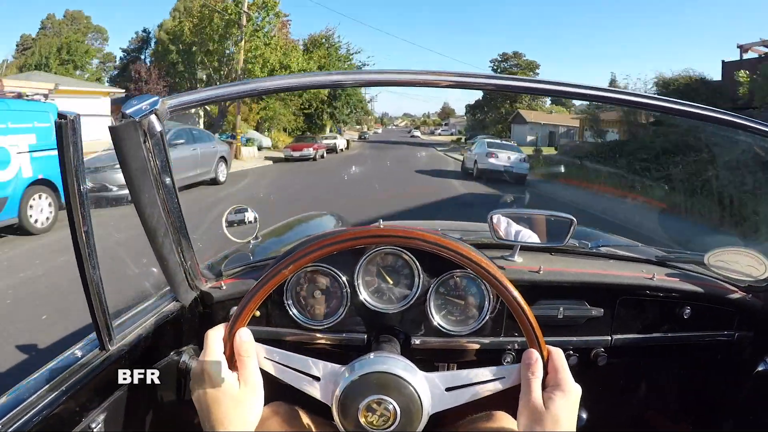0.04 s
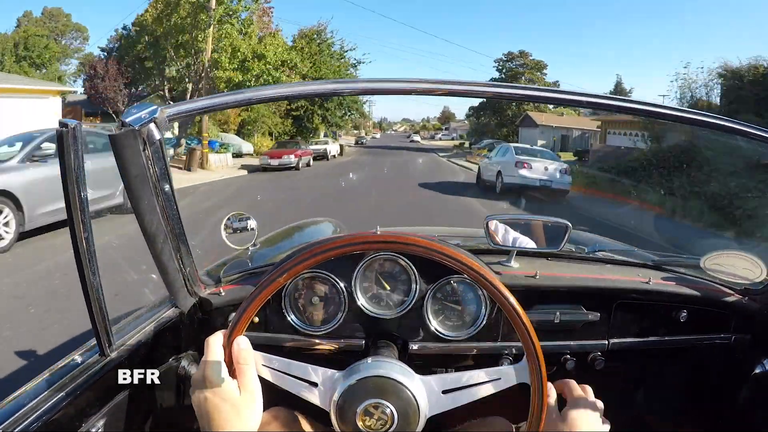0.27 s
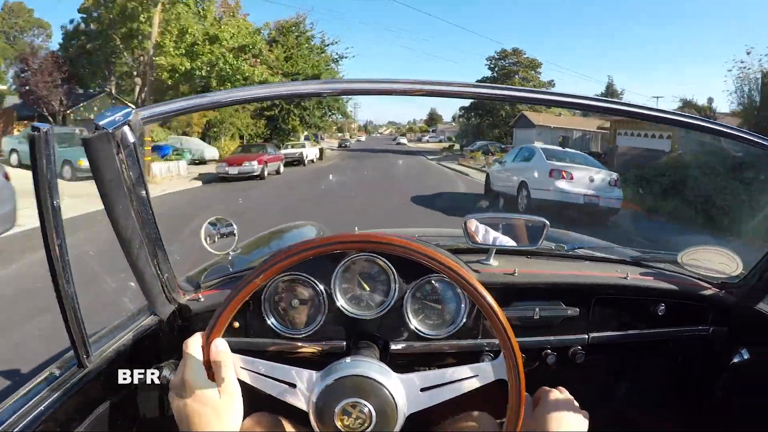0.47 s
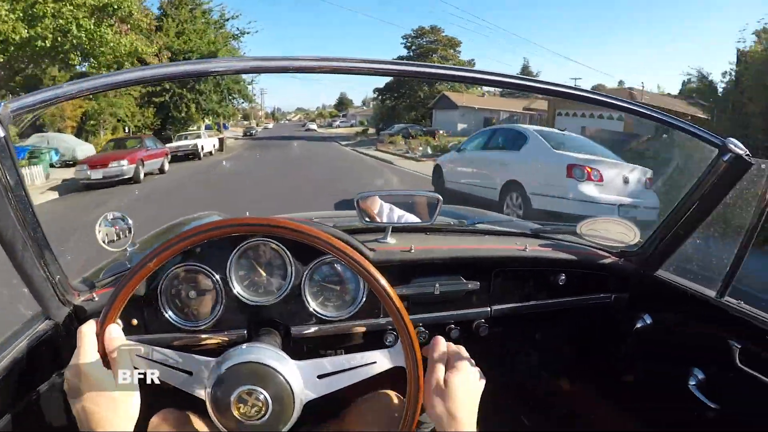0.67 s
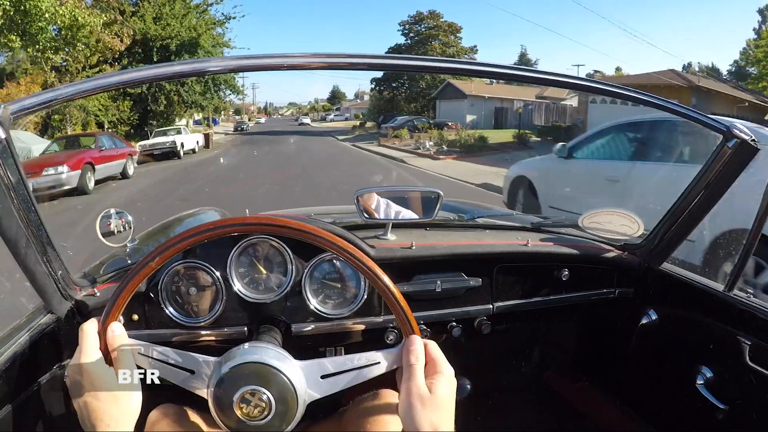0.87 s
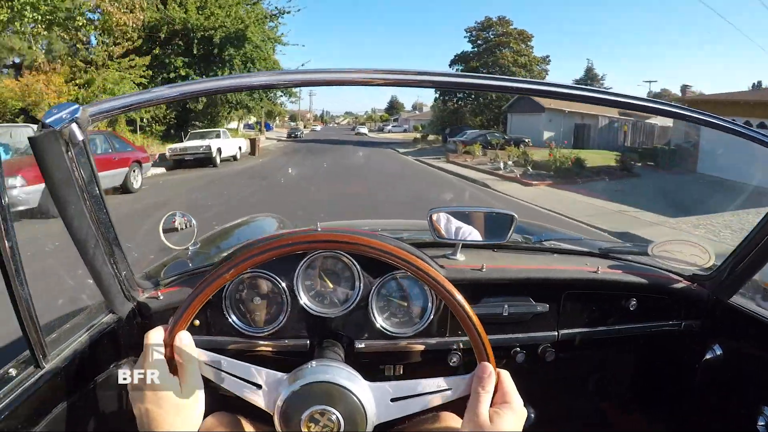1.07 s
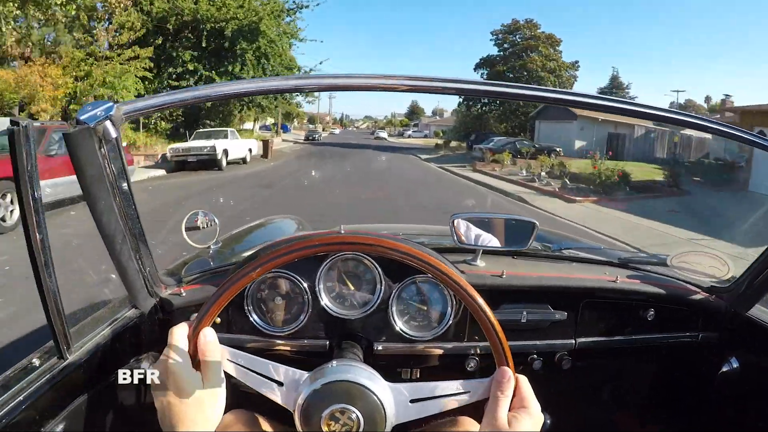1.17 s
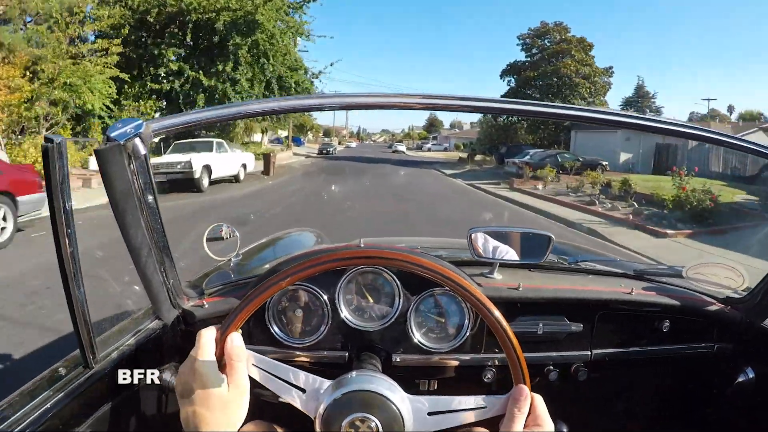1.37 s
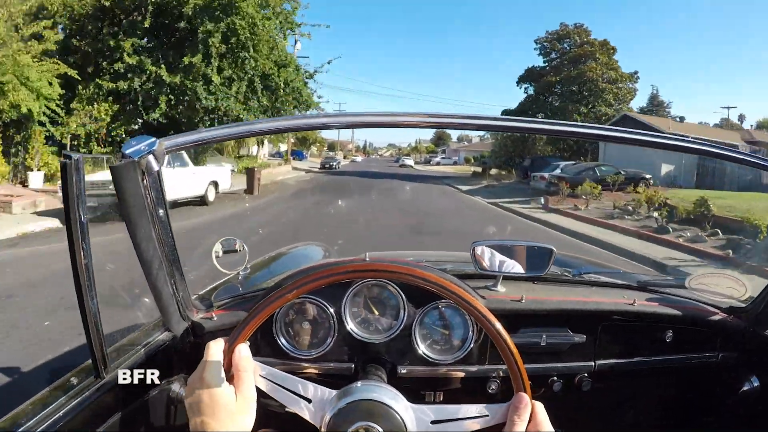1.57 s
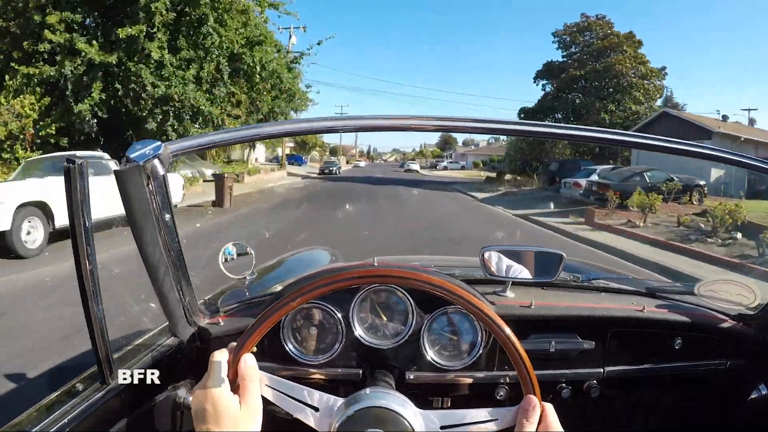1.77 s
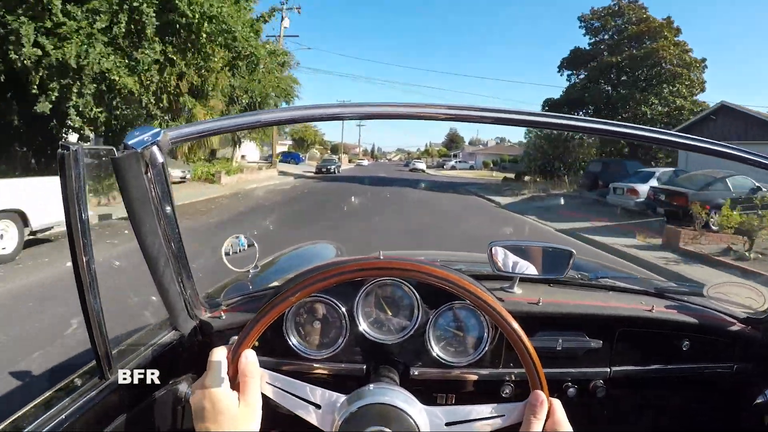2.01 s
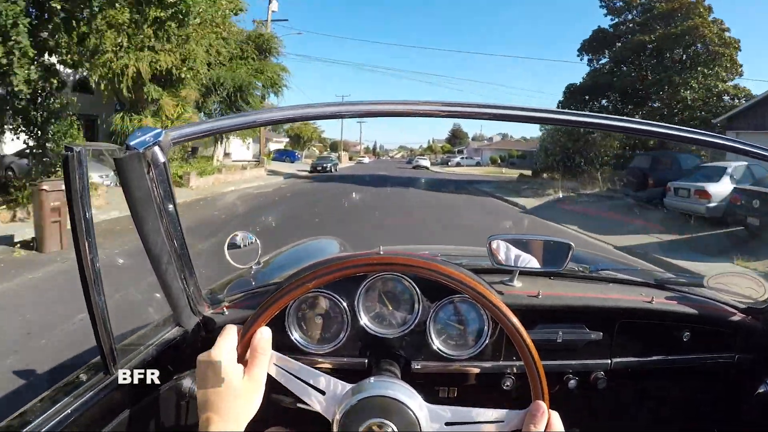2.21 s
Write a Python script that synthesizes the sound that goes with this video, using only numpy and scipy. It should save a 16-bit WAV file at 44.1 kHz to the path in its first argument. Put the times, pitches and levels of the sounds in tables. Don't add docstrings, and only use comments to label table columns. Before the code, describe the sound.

Wind booms and throbs around the driver in an open-top car at town speed, over steady road rumble; dull gusts thump the close stereo microphone, while faint tyre and engine hiss swells past parked cars.

```python
import sys
import numpy as np
from scipy import signal
from scipy.fft import rfft, irfft
from scipy.io import wavfile
from scipy.ndimage import uniform_filter1d, minimum_filter1d

SR = 44100
rng = np.random.default_rng(int(sys.argv[2]) if len(sys.argv) > 2 else 0)


def waveform_to_disk(signal):
    frames = np.transpose(np.atleast_2d(signal))
    scaled = np.clip(frames, -1, 1) * 32767
    samples = np.round(scaled).astype(np.int16)
    wavfile.write(sys.argv[1], SR, samples)


def undo_db(level):
    steps = np.asarray(level, float) / 20
    return 10 ** steps


N = 99180
SIDE_SIGN = np.array([[1], [-1]])

# t/s, f/Hz, level/dB
COCKPIT_BOOM = [(0.0, 81.16, -10), (0.07, 77.84, -15), (0.27, 85.27, -14), (0.31, 81.35, -19),
                (0.61, 84.38, -7), (0.72, 74.55, -9), (0.81, 59.23, -15.5), (0.88, 72.62, -23),
                (0.96, 72.83, -18), (1.22, 69.3, -16), (1.33, 74.9, -7.5), (1.49, 73.9, -13),
                (1.56, 84.3, -11.5), (1.66, 79.68, -18), (1.85, 80.2, -8), (2.0, 79.6, -12.5),
                (2.22, 93.2, -15.5), (2.25, 89.0, -36)]
# t/s, f/Hz, level/dB
WINDSCREEN_THROB = [(0.0, 40.4, -14.5), (0.05, 43.9, -12), (0.15, 36.43, -32.5), (0.22, 37.86, -34.5),
                    (0.37, 40.38, -23.5), (0.46, 45.49, -27.5), (0.71, 47.27, -18.5), (0.83, 50.6, -12.5),
                    (1.0, 46.2, -15.5), (1.11, 39.36, -43.5), (1.43, 38.68, -18.5), (1.49, 40.46, -10.5),
                    (1.56, 49.15, -20), (1.67, 51.9, -11), (1.9, 40.84, -19), (2.11, 41.7, -14),
                    (2.22, 47.3, -37.5), (2.25, 48, 3.5)]
# f/Hz, level/dB per Hz
RUMBLE_SPECTRUM = [(12, -16), (25, -10.5), (45, -5), (65, -10.5), (95, -9), (115, -25), (160, -25.5),
                   (400, -92.5)]
# f/Hz, level/dB per Hz
WIND_SPECTRUM = [(59, -21.5), (100, -14), (141, -14.5), (253, -19), (313, -20.5), (553, -43.5),
                 (900, -36.5), (1170, -73.5), (1980, -120)]
# f/Hz, correlation/-1 to 1
WIND_CORRELATION = [(100, 0.55), (200, 1), (350, 0.23), (600, 0.49)]
# centre t/s, length t/s, level/dB, left minus right level/dB, correlation/-1 to 1
EDDY_PUFFS = [(0.008, 0.018, -26, 8, 0.22), (0.036, 0.021, -22, 7.5, -0.57), (0.081, 0.016, -23, 0, -0.065),
              (0.198, .016, -41, 6, 0.31), (0.243, 0.016, -20, 2.5, -1.7),
              (0.401, 0.022, -24.5, -5.5, -0.9), (0.478, 0.0092, -30.5, -15, 0.41),
              (0.563, .014, -44, -2, 0.18), (0.689, 0.011, -25, -3, -1.5), (0.767, 0.033, -27, -19.5, 0.68),
              (0.81, 0.016, -23.5, -10, 0.27), (1.108, 0.016, -23, -16, 0.18),
              (1.119, .016, -30.5, -16, -0.67), (1.18, 0.013, -35.5, -8, 0.59),
              (1.419, 0.023, -39.5, -5, -0.5), (1.687, .010, -19.5, 4, -.8)]
# centre t/s, length t/s, level/dB, f/Hz, left minus right level/dB
ROAD_THUMPS = [(0.01, 0.052, -18.5, 170.3, -4), (0.043, 0.017, -19.5, 151.5, -11.5),
               (0.085, 0.046, -29.5, 177.8, 10), (0.198, 0.031, -26.5, 160, 9),
               (0.245, 0.025, -31.5, 200, 4), (0.204, 0.021, -34.5, 299, -3), (0.382, .03, -29, 280, -1),
               (.467, 0.022, -32, 305, 1), (0.76, .04, -26, 96, -2), (0.77, 0.024, -18.5, 165.3, -7),
               (0.823, 0.03, -17, 140, -4), (0.818, 0.0297, -23, 230, -11), (1.098, 0.025, -24, 108, -5),
               (1.124, .03, -26, 188, -5), (1.126, .035, -21, 137.7, -5), (1.2, .05, -26, 100, -3),
               (.985, 0.021, -36.5, 266, -6), (1.229, 0.086, -22.5, 134.6, -5.5),
               (1.5, 0.049, -34, 198.7, -12.5), (1.444, 0.018, -31, 130, -3), (1.911, .03, -29, 143, -3),
               (1.7, 0.093, -26, 110, -2), (1.693, 0.015, -26, 178.5, 8.5), (2.04, 0.1, -31.5, 180.7, -8),
               (2.209, 0.021, -24, 170, -9.5)]
# t/s, level/dB
ROAR_LEVEL = [(0.02, -38.5), (0.12, -39), (0.16, -35), (0.22, -37), (0.32, -36.5), (0.39, -38.5),
              (0.58, -34.5), (0.86, -42.5), (1.1, -43.5), (1.37, -40.5), (1.38, -38.5), (1.4, -42),
              (1.5, -38), (1.95, -40.5), (2.2, -37), (2.25, -37.5)]
# f/Hz, level/dB per Hz
ROAR_MID_SPECTRUM = [(400, 3.5), (640, -12.5), (950, -6), (1450, -9.5), (1950, -10), (3000, -13),
                     (4650, -19), (6200, -16)]
# f/Hz, level/dB per Hz
ROAR_SIDE_SPECTRUM = [(400, -26.5), (550, -3), (1000, -14.5), (1500, -17), (2200, -23), (3500, -25.5),
                      (4600, -26), (6000, -17)]
# f/Hz, level/dB
ROAR_LEFT_RIGHT = [(500, -4), (850, -8), (1450, 2), (2500, -4), (4200, -1), (5500, 5.5), (8000, -4.5)]
# f/Hz, share/1
ROAR_QUARTER_CYCLE = [(600, 0.49), (1000, 0.64), (1500, 0.68), (2000, 0.41), (4200, -.2), (5300, -.6),
                      (6500, -0.22), (8000, -.3)]
# f/Hz, share/1
ROAR_SWELL_SHARE = [(600, -.3), (1200, -0.28), (2500, 0.3), (5000, -0.021), (9000, 0.014), (12000, .4)]
# f/Hz, level/dB
MIC_TREBLE_LOSS = [(6400, 0), (7000, -8.5), (8000, -13), (9500, -21), (10800, -30.5), (14200, -33.5),
                   (16000, -59.5)]
# centre t/s, length t/s, depth level/dB
HISS_LULLS = [
    (.05, .08, 8),
    (.83, .06, 9),
    (1.0, .13, 10),
    (1.15, .04, 9),
    (1.43, .04, 6),
    (1.86, .1, 6),
    (2.02, .06, 8),
]
# f/Hz, level/dB rms
WHINE_LINES = [(305, -49), (948, -62.5), (1229, -58), (1646, -67), (1860, -57.5), (1972, -55),
               (2132, -63.5), (2340, -68.5), (2490, -58.5), (2922, -66.5)]


def rms_one(x):
    return x / np.sqrt(np.mean(x ** 2) + 1e-20)


def in_time(rows):
    s, *columns = np.transpose(rows)
    return [np.interp(np.arange(N) / SR, s, column) for column in columns]


def at_hz(points, hz):
    table_hz, value = np.transpose(points)
    return np.interp(np.log(hz), np.log(table_hz), value)


def bin_hz():
    return np.maximum(np.arange(N // 2 + 1) * SR / N, 1)


def drift(rate_hz):
    step, settle = 40, 2000
    pole = np.exp(-2 * np.pi * rate_hz * step / SR)
    noise = rng.standard_normal(N // step + settle + 2)
    slow = signal.lfilter([1], [1, -2 * pole, pole * pole], noise)[settle:]
    return np.interp(np.arange(N) / step, np.arange(len(slow)), rms_one(slow - slow.mean()))


def coloured(spectrum, channels, top=((1, 0), (2, 0))):
    hz = bin_hz()
    low_cut = 1 + (spectrum[0][0] / hz) ** 4
    gain = undo_db(at_hz(spectrum, hz) + at_hz(top, hz)) / low_cut
    return rms_one(irfft(rfft(rng.standard_normal((channels, N))) * gain, N))


def bands(x, low_hz, count):
    spectrum = rfft(x)
    place = np.clip(2 * np.log2(bin_hz() / low_hz), 0, count - 1)
    for k in range(count):
        weight = np.clip(1 - abs(place - k), 0, 1)
        yield low_hz * 2 ** (k / 2), irfft(spectrum * weight, N)


def pan(db):
    return undo_db(np.array([[db / 2], [-db / 2]]))


def swell(s, length, db):
    return undo_db(db) * np.exp(-0.5 * ((np.arange(N) / SR - s) / (0.41 * length)) ** 2)


def waver(hz, db, wobble, flutter_db):
    phase = 2 * np.pi * np.cumsum(hz * (1 + wobble * drift(18.45))) / SR
    return np.sqrt(2) * undo_db(db + flutter_db * drift(8.2)) * np.cos(phase)


def boom():
    flutter_db = 4
    sung = waver(*in_time(COCKPIT_BOOM), 0.065, flutter_db)
    flapping = waver(*in_time(WINDSCREEN_THROB), 0.05, flutter_db)
    return sung + flapping


def rumble():
    level_db, side_db = -11.5, -31
    mid, side = coloured(RUMBLE_SPECTRUM, channels=2)
    return undo_db(level_db) * mid + undo_db(side_db + 2.0 * drift(6)) * side * SIDE_SIGN


def wind():
    level_db, balance_db, lumpy_db, lumps_hz = -28, -3.5, 1, 39
    lumps = np.array([drift(lumps_hz), drift(lumps_hz)])
    out = 0
    for hz, (mid, side) in bands(coloured(WIND_SPECTRUM, channels=2), 110, count=7):
        alike = np.clip(at_hz(WIND_CORRELATION, hz), -1, 1)
        pair = np.sqrt(1 + alike) * mid + np.sqrt(1 - alike) * side * SIDE_SIGN
        out = out + pair * undo_db(lumpy_db * (1.2 * lumps + 1.3 * drift(19)))
    return undo_db(level_db) * pan(balance_db) * rms_one(out)


def puffs():
    dull = signal.butter(3, [170, 642], "band", fs=SR, output="sos")
    noise = signal.sosfilt(dull, rng.standard_normal(N))
    envelope = abs(signal.hilbert(noise))
    noise = rms_one(noise / (envelope + 0.37 * noise.std()))
    out = 0
    for s, length, db, pan_db, alike in EDDY_PUFFS:
        polarity = np.array([[1], [np.clip(alike, -1, 1)]])
        out = out + swell(s, length, db) * pan(pan_db) * noise * polarity
    return out


def thumps():
    wobble, overtone_db, boost_db = 0.07, -13, 3.5
    unsteady_time = np.cumsum(1 + wobble * drift(39.9)) / SR
    out = 0
    for s, length, db, hz, pan_db in ROAD_THUMPS:
        phase = 2 * np.pi * hz * unsteady_time
        cycles = np.cos(phase) + undo_db(overtone_db) * np.cos(1.7 * phase)
        out = out + swell(s, length, db) * pan(pan_db) * np.sqrt(2) * cycles
    return undo_db(boost_db) * out


def squeeze(x):
    threshold, share = 0.38, 0.68
    window = int(0.016 * SR) + 1
    peak = -minimum_filter1d(-abs(x).max(axis=0), window)
    level = uniform_filter1d(peak, window)
    return x * np.maximum(level / threshold, 1) ** -share


def roar():
    side_db, patchy_db, air_patchy_db = -3, 0.5, 1.0
    air_hz, lull_hz = 9000, 12000
    mid = coloured(ROAR_MID_SPECTRUM, 1, MIC_TREBLE_LOSS)
    side = undo_db(side_db) * coloured(ROAR_SIDE_SPECTRUM, 1, MIC_TREBLE_LOSS)
    quarter_cycle = signal.hilbert(mid[0]).imag
    db, = in_time(ROAR_LEVEL)
    lull = sum(depth_db * swell(s, length, 0) for s, length, depth_db in HISS_LULLS)
    together, air = drift(5.1), drift(8.1)
    out = 0
    for hz, (mid_band, side_band, early) in bands(np.vstack([mid, side, quarter_cycle]), 654, count=10):
        patch_db = patchy_db * (0.41 * together + drift(16))
        patch_db = patch_db + at_hz(ROAR_SWELL_SHARE, hz) * (db - db.mean())
        if hz > air_hz:
            patch_db = patch_db + air_patchy_db * air
        if hz > lull_hz:
            patch_db = patch_db - lull
        difference = side_band - at_hz(ROAR_QUARTER_CYCLE, hz) * early
        pair = mid_band + difference * SIDE_SIGN
        out = out + undo_db(patch_db) * pan(at_hz(ROAR_LEFT_RIGHT, hz)) * pair
    return undo_db(db) * out


def whines():
    db, = in_time(ROAR_LEVEL)
    swelling_db = db - db.mean()
    return sum(waver(hz, level_db + swelling_db, 0.01, 2.5) for hz, level_db in WHINE_LINES)


def scene():
    bass = pan(-2.5) * (boom() + rumble())
    return squeeze(bass + wind() + puffs() + thumps()) + roar() + whines()


def roll_off(x):
    return signal.sosfilt(signal.butter(12, 15050, fs=SR, output="sos"), x)


def record(dry):
    ceiling, fade_s = 0.88, 0.004
    fade = np.minimum(np.arange(N)[::-1] / (fade_s * SR), 1)
    finished = fade * ceiling * np.tanh(dry / ceiling)
    return roll_off(finished)


dry = scene()
out = record(dry)
waveform_to_disk(out)
```